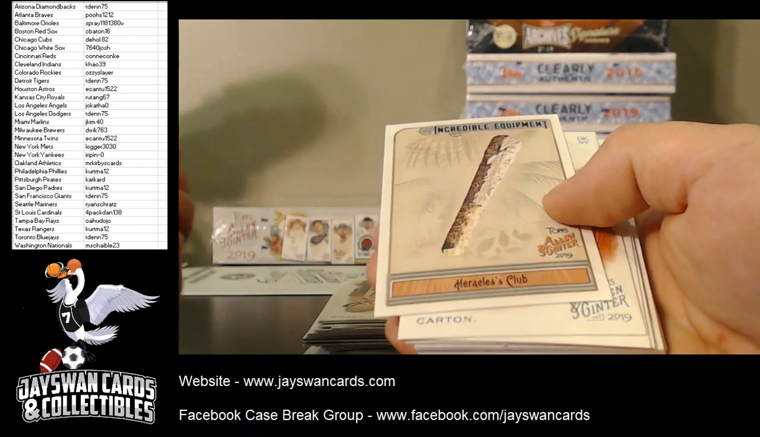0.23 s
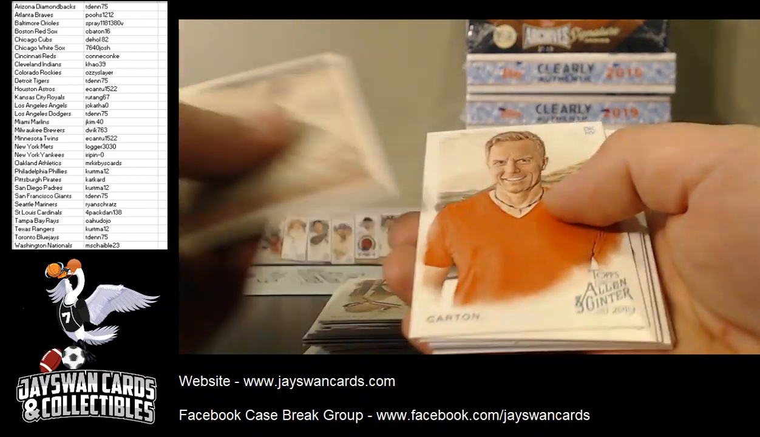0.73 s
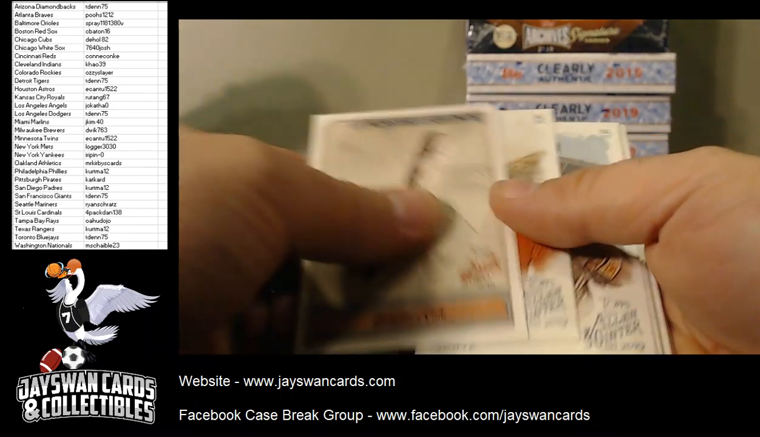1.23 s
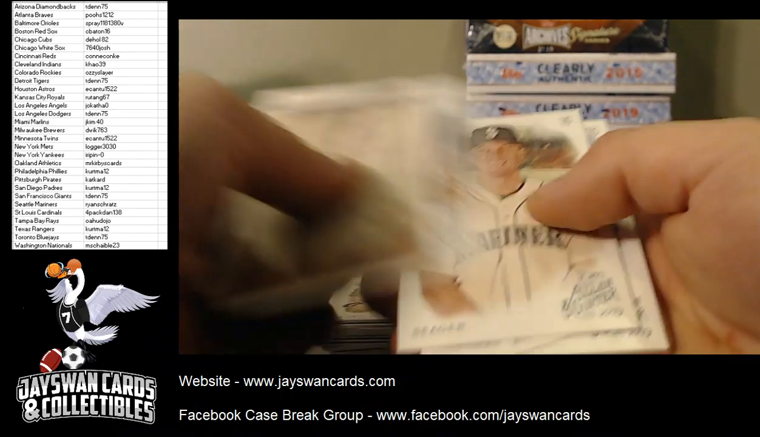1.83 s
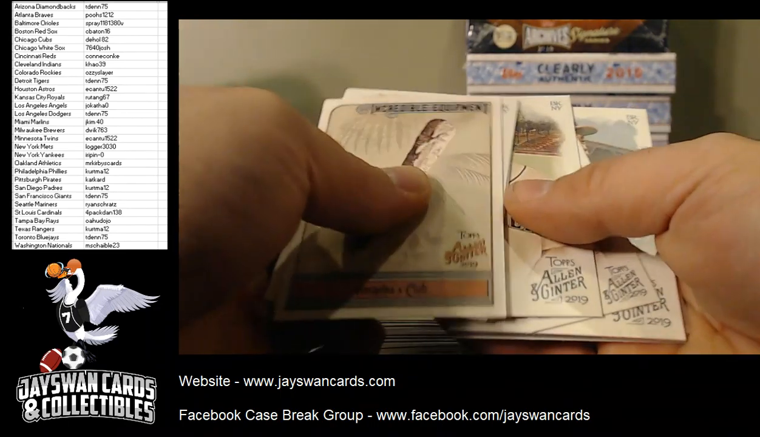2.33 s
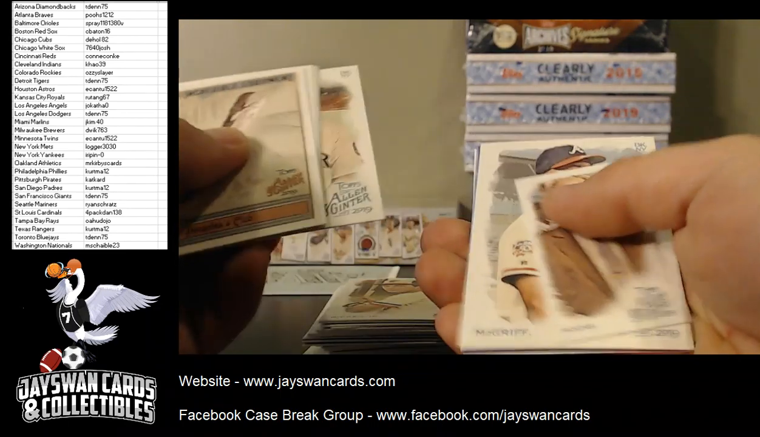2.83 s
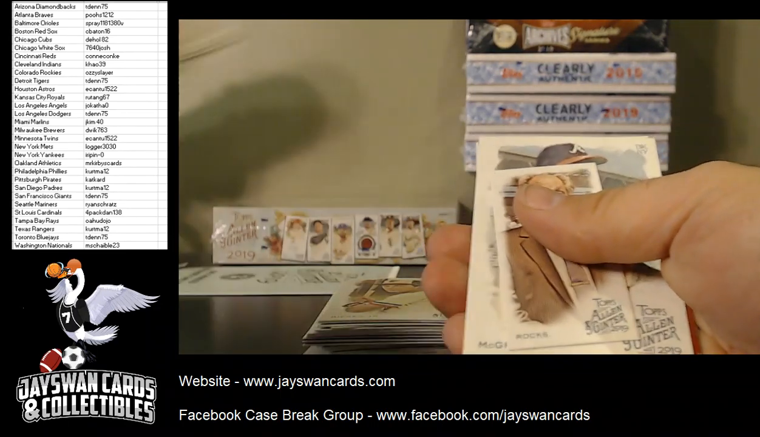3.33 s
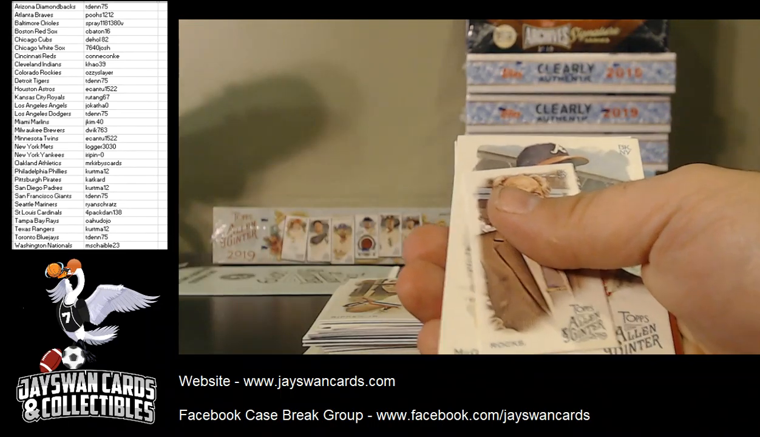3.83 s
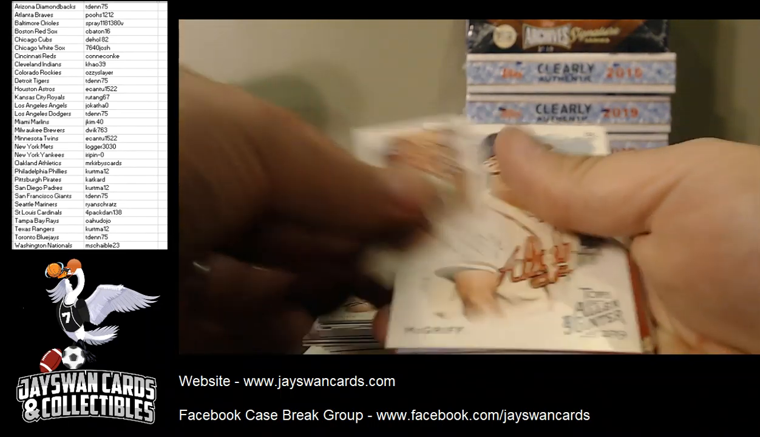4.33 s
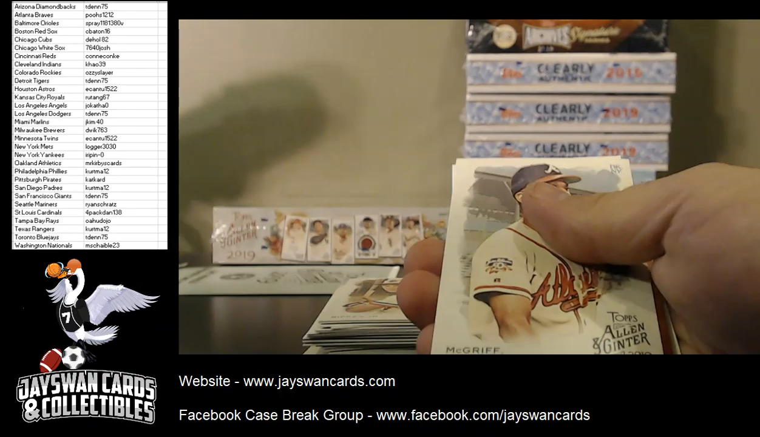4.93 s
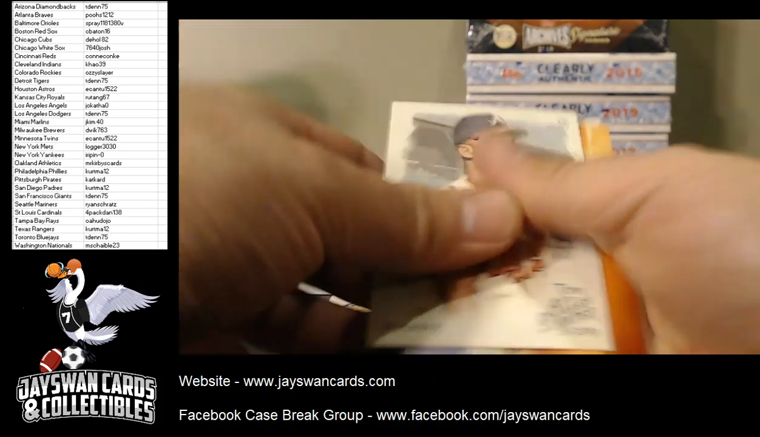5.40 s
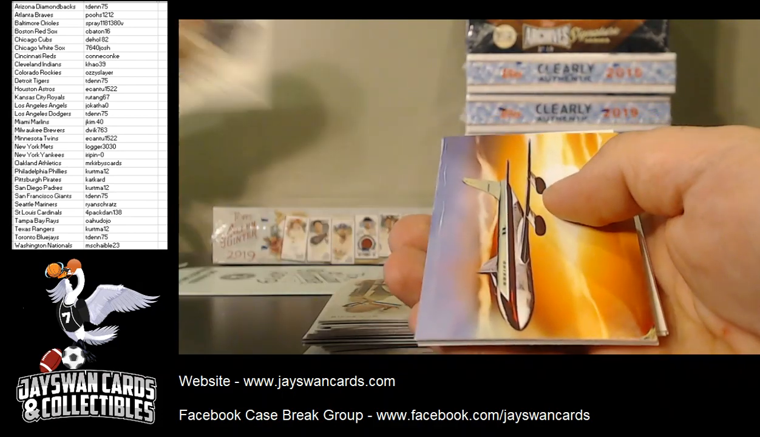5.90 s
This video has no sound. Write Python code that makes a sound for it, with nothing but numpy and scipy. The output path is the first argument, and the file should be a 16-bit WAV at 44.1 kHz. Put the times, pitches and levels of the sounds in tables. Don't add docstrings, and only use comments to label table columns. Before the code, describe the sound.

Quick card flicks and soft papery swipes over a quiet room hum, with low table bumps and a hard thud late on.

```python
import sys
import numpy as np
from scipy import signal
from scipy.fft import rfft, irfft
from scipy.io import wavfile
from scipy.ndimage import uniform_filter1d

SR = 44100
rng = np.random.default_rng(int(sys.argv[2]) if len(sys.argv) > 2 else 0)


def wrap_up_sound(samples):
    columns = np.atleast_2d(samples).T
    tamed = np.clip(columns, -1, 1)
    steps = np.round(tamed * 32767).astype(np.int16)
    wavfile.write(sys.argv[1], SR, steps)


def ratio_of_db(decibels):
    return 10 ** (np.asarray(decibels, float) / 20)


N = 271653

# start_s, length_s, hiss_db, edge_ring_hz
GLIDES = [(0.697, 0.041, -60, 2000), (1.498, 0.064, -52, 7550), (2.007, 0.12, -54.5, 1970),
          (2.12, 0.038, -56.5, 7050), (2.228, 0.11, -53.5, 6730), (2.45, 0.13, -59, 6800),
          (2.725, 0.071, -47.5, 8800), (2.779, 0.066, -51, 3900), (2.972, 0.089, -55.5, 3740),
          (3.04, 0.11, -60, 6800), (3.143, 0.092, -52, 6700), (3.425, 0.036, -61.5, 3900),
          (3.529, 0.089, -47.5, 6720), (4.418, 0.062, -62.5, 7200), (4.594, 0.032, -46, 5200),
          (5.291, 0.059, -53, 5130)]
# start_s, length_s, hiss_db, edge_ring_hz
PUSHES = [(0.063, 0.03, -59, 4800), (0.135, 0.014, -50.5, 7300), (0.513, 0.13, -66.5, 2030),
          (0.62, 0.068, -63.5, 2280), (0.871, 0.022, -66, 8700), (0.925, 0.052, -67.5, 2300),
          (1.411, 0.075, -66, 7500), (1.596, 0.22, -63.5, 3100), (2.324, 0.14, -59.5, 3120),
          (2.883, 0.079, -56, 2390), (3.644, 0.1, -61, 2150), (3.723, 0.11, -61.5, 2130),
          (4.11, 0.064, -57.5, 3350), (4.18, 0.057, -59, 2870), (4.348, 0.081, -68.5, 2020),
          (4.575, 0.014, -56, 3700), (5.004, 0.14, -65, 3800), (5.21, 0.19, -56.5, 6960),
          (5.356, 0.033, -55.5, 3400), (5.515, 0.079, -60.5, 6500), (5.472, .055, -71.5, 7000),
          (5.593, .04, -71, 6000), (5.696, 0.005, -66, 6000), (5.721, 0.026, -62, 3070),
          (5.727, .022, -65, 9000), (5.872, 0.011, -56, 6660)]
# start_s, length_s, hiss_db, edge_ring_hz
FLICKS = [
    (0.098, 0.0086, -49.5, 2700),
    (2.097, 0.015, -53, 5460),
    (4.689, 0.035, -61, 2150),
    (5.75, 0.017, -54, 9300),
    (5.762, 0.046, -48, 3250),
    (5.819, 0.021, -49, 7200),
]
# start_s, length_s, hiss_db, edge_ring_hz
SWIPES = [
    (1.545, 0.068, -56, 4840),
    (2.564, 0.029, -49, 5630),
    (2.588, 0.073, -54.5, 6860),
    (4.615, 0.085, -52.5, 4720),
]
STROKE_BODY_DB = [
    -14,
    -5.5,
    2,
    -3.5,
]
STROKE_SHEEN_DB = [
    -1.5,
    -2.5,
    0.5,
    3.5,
]
SHEEN_SLOPE = [
    1.2,
    5.1,
    4.3,
    .1,
]
# frequency_hz, level_db
PAPER = [(1470, -32), (2500, -9.5), (2610, -11.5), (3650, -9), (4840, -8), (5310, -11.5), (7260, -5.5),
         (9300, -7), (12100, -48.5), (20500, -120)]
# frequency_hz, level_db
SHEEN = [(7500, -25), (9300, -1), (12500, -1.5), (15500, -3.5), (16500, -5)]
# frequency_hz, level_db
BODY = [(150, 1), (290, 6), (500, 2), (873, 3), (1090, -2), (1810, 6), (2060, 6.5), (4000, -12),
        (5200, -19), (8800, -120)]
# frequency_hz, likeness_0_to_1
CARD_SAME = [(40, 0.87), (70, 0.2), (300, 0.35), (2000, 0.7), (8000, 0.47), (16000, 0.38)]
# time_s, level_db
RUSTLE = [(0.0, -56.5), (0.08, -55), (0.17, -86), (0.75, -65), (0.86, -84), (1.3, -80.5), (1.6, -57),
          (1.8, -78), (2.02, -73), (2.09, -60), (3.3, -62), (3.65, -59), (4.08, -67), (4.19, -58.5),
          (4.46, -81.5), (5.21, -62.5), (5.75, -88), (6.16, -72.5)]
# frequency_hz, level_db
SKIN = [(350, -26), (600, -8), (1600, -5.5), (2280, -2.5), (4560, -3.5), (5440, -9.5), (6850, -5.5),
        (15500, -15)]
# time_s, peak_db, ring_hz, crack_re_peak_db
SNAPS = [(0.097, -34.5, 2540, 1), (0.1062, -28.5, 3170, -7), (0.1163, -38, 1960, 8),
         (0.3527, -40, 1200, -17), (0.8663, -31.5, 11300, -23), (1.761, -44.5, 7200, 5.5),
         (2.105, -44, 5400, 2), (2.3776, -43, 3210, -8), (4.594, -44, 3300, 5), (4.545, -42.5, 1660, -2),
         (4.692, -42, 5730, 1), (4.7007, -37.5, 2180, -8), (5.5812, -49.5, 6900, 11.5),
         (5.7172, -38.5, 3100, 1.5), (1.474, -51.5, 2000, 11), (5.7776, -37, 1500, 2),
         (5.797, -33, 3200, 0), (5.8083, -32.5, 1700, 6)]
# time_s, peak_db, ring_hz, thud_re_peak_db, crack_re_peak_db
TAPS = [(0.0105, -44, 2210, 6.5, 10.5), (0.0415, -41.5, 1130, 6.5, 7.5), (0.1026, -34.5, 2950, 7.5, 2),
        (1.6325, -41.5, 3250, 5.5, 8.5), (2.0625, -40, 1770, 4.5, 4), (2.0932, -37.5, 1100, 8.5, 7),
        (2.3607, -44, 2540, 4, 5), (2.573, -44, 1500, 9, 7), (3.1500, -41.5, 885, 5.5, 6),
        (3.5993, -39.5, 2020, 9, 5), (3.6614, -56, 820, 12, -2), (5.3666, -38, 690, 2, 0)]
# frequency_hz, level_db
CRACK = [(300, -16), (700, -1), (2000, -3), (4000, -4), (8000, -3.5), (13000, -13), (15500, -17),
         (16500, -25)]
# time_s, peak_db, sign
WHIP = [
    (5.7624, -8.5, -1),
    (5.7626, -7.5, 1),
    (5.76295, -8, -1),
    (5.7635, -19, 1),
    (5.76415, -19, -1),
    (5.7655, -20.5, 1),
    (5.8085, -27, -1),
    (5.7172, -36, 1),
]
# ring_hz, level_db, t60_s
WHIP_RING = [(573, -7, .006), (1237, -8.5, .009), (1750, -8.5, .007), (2374, -9, .0075), (3109, -11, .011),
             (4018, -15.5, .009), (4570, -21.5, .012), (5480, -.5, .005), (6286, -4, .006),
             (7460, -7, .006), (8231, -3, .003), (9800, -4, .004), (11500, -9, .005), (13440, -12, .0045)]
# time_s, peak_db, ring_hz
PINGS = [(0.0108, -35, 4500), (0.0108, -41, 800), (0.0958, -32, 2500), (0.0958, -32, 7500),
         (0.1028, -38, 4200), (0.1056, -26.5, 3070), (0.1056, -29, 4700), (0.1056, -29, 6500),
         (0.91, -52, 7000), (2.0625, -43, 1750), (2.0625, -40.5, 700), (2.0625, -36, 4160),
         (2.0932, -38.5, 656), (2.0955, -33, 5940), (2.0955, -39, 4300), (2.104, -38, 2900),
         (2.1045, -32, 4400), (2.1035, -30, 5050), (2.1045, -32, 6385), (2.104, -33, 9300),
         (2.576, -30, 6340), (2.576, -29, 10000), (2.576, -34, 12300), (3.15, -42, 860), (3.15, -40, 1870),
         (3.15, -42, 2640), (3.157, -38, 3510), (3.157, -40, 7400), (3.178, -46, 430), (3.195, -50, 400),
         (2.372, -45, 380), (2.574, -38, 304), (5.7635, -35, 640), (3.5993, -34.5, 1850),
         (3.5993, -38, 2390), (3.5993, -38, 1040), (3.6612, -43.5, 280), (4.5452, -39, 345),
         (4.5452, -45, 830), (4.5452, -41, 3620), (4.595, -41, 3420), (4.595, -39, 4260),
         (4.595, -39, 7430), (4.693, -33, 5790), (4.693, -40, 4380), (5.3672, -32, 800),
         (5.3672, -38, 2190), (5.3672, -36.5, 3190), (5.7175, -38.5, 880), (5.7175, -36, 2640),
         (5.7175, -32.5, 3165), (5.7175, -41, 4070), (5.8083, -27.5, 1080), (5.8083, -30.5, 1980),
         (5.8083, -30, 4870), (5.8083, -33, 2700), (5.8083, -30, 11300), (5.8083, -35, 15000)]
# time_s, peak_db, ring_hz
RATTLE = [
    (4.698, -29, 200),
    (4.7065, -46, 800),
    (4.712, -43, 650),
    (4.7175, -45, 850),
    (4.724, -44, 700),
    (4.737, -46, 420),
    (4.752, -42, 260),
]
# start_s, length_s, level_db, first_hz, last_hz
SINGS = [(2.33, .1, -61, 2500, 3200), (2.77, .08, -59, 4900, 3300), (2.883, 0.081, -58, 2000, 2840),
         (2.961, .12, -61, 3300, 4000), (3.69, 0.15, -61, 2200, 2900), (4.125, .05, -58, 3400, 2890),
         (5.7563, 0.0081, -38.5, 3050, 3070), (5.783, 0.016, -47, 3100, 3200),
         (0.088, 0.011, -52, 2300, 2580), (.128, .036, -55.5, 1000, 848), (1.49, .02, -64, 1900, 2000),
         (1.509, 0.032, -60, 4500, 3800), (2.077, 0.012, -51, 1800, 1800), (2.27, 0.038, -62, 4400, 5000),
         (2.403, .03, -55, 3000, 3200), (3.545, .04, -57, 3200, 3400), (3.543, 0.027, -55, 4700, 4570),
         (4.59, .032, -52, 3400, 3800), (5.52, .068, -61.5, 3050, 3560), (5.7555, .005, -47, 9300, 9800),
         (5.766, 0.035, -52, 820, 695), (5.767, 0.039, -48, 2400, 2000)]
# peak_s, rise_s, board_db, grip_0_to_1.3
DRAGS = [(0.035, 0.053, -62.5, 1.3), (0.12, 0.035, -49, 0.96), (0.5, 0.06, -55, 0.3), (0.7, 0.1, -49, 0.05),
         (0.95, 0.13, -60, .6), (1.52, 0.049, -49.5, 0.68), (1.63, 0.035, -48.5, .7),
         (1.77, 0.08, -49.5, .05), (2.1, 0.054, -48, .55), (2.38, 0.07, -46, 0.6),
         (2.53, 0.073, -54.5, 0.4), (2.75, 0.26, -56.5, 0.7), (2.96, 0.085, -47, 0.25),
         (3.19, 0.05, -50.5, 0.58), (3.5, 0.049, -44.5, 0.28), (3.6, 0.024, -56, .9),
         (3.77, 0.08, -48, 0.3), (4.08, 0.077, -52, 0.24), (4.55, 0.06, -54, .4),
         (4.65, 0.075, -45.5, 0.56), (4.73, 0.064, -44, .55), (1.33, 0.11, -58.5, .4),
         (4.9, 0.06, -52, 0.2), (5.2, 0.11, -50.5, 0.56), (5.45, 0.15, -65, 1.07),
         (5.775, 0.032, -51.5, 1.3), (5.83, 0.036, -42, 0.73)]
REST_DB = [
    [-59],
    [-76],
    [-76.5],
    [-74.5],
]
# frequency_hz, level_db
SCRAPE = [(140, -20), (240, -0.5), (411, -2), (562, -12), (947, -12), (1500, -29), (1950, -39),
          (3300, -120)]
# start_s, length_s, level_db
JUDDER = (3.315, 0.11, -45.5)
JUDDER_DB = [
    [-2],
    [0.5],
    [-6.5],
    [-13.5],
]
# time_s, level_db
CATCHES = [(3.256, -47.5), (3.265, -49), (3.299, -46), (3.304, -55), (3.321, -44), (3.328, -44.5),
           (3.336, -53), (3.344, -43.5), (3.351, -45.5), (3.364, -45.5), (3.37, -48), (3.38, -46.5),
           (3.391, -49), (3.4, -51), (3.41, -48.5), (3.419, -47), (3.425, -49), (3.437, -54), (3.49, -53),
           (3.509, -57)]
# ring_hz, level_db, t60_s
JUDDER_RING = [(95.5, 5, 0.092), (164.5, 3, 0.11), (228, -6, .04), (348, -1, .03), (470, 1, 0.014),
               (900, 1, 0.0092), (1200, -7, .008), (1500, -4, .006), (2000, -6, 0.0044)]
# time_s, board_peak_db, strongest_ring_hz, t60_s, left_minus_right_db
KNOCKS = [(0.012, -38, 151, 0.071, 7), (0.043, -38.5, 177, 0.094, 6), (0.1215, -33, 105, .04, 2),
          (0.653, -40.5, 70.0, 0.16, 2), (1.484, -34, 61.4, 0.15, 4), (1.624, -43.5, 61.7, 0.25, -11),
          (1.735, -36.5, 66.3, 0.26, 2), (2.938, -42.5, 50, 0.44, 1.0), (3.711, -36.5, 69.6, 0.48, 1.5),
          (3.76, -37.5, 59.2, 0.19, -6), (4.066, -39.5, 65.6, 0.24, 4.0), (4.551, -30, 80.7, 0.19, 8),
          (4.671, -29.5, 92, 0.15, 0), (5.7183, -33, 187, 0.064, 5), (5.764, -28.5, 200, 0.091, 3),
          (5.822, -25.5, 57, 0.13, 5)]
# ring_hz, level_db, t60_s
BOARD = [(109.5, -3.5, 0.09), (165, -21, 0.21), (208, -28, 0.17), (233, -14, 0.19), (308, -6.5, 0.072),
         (393, -19, 0.11), (590, -7.5, 0.013)]
# ring_hz, level_db, t60_s, delay_s
SLAM = [(74, 0.5, 0.124, .0022), (105, -1.5, .105, .006), (174, -23, .22, 0.011),
        (215, -14.5, 0.19, 0.0011), (317, -13.5, .08, .0006), (398, -17, .086, 0.00042),
        (447, 2.5, 0.0052, 0.000081), (588, -4, 0.0078, 0.00012), (775, -28, .06, .0006)]
# time_s, level_db, resting_arm_damping_db_per_s
JOLTS = [
    (0.128, -15.5, 2),
    (4.71, -13.5, 16),
    (5.819, -15.5, -4),
]
# sway_hz, t60_s, share_left, share_right
SWAY = [(28, .95, -.42, .5), (24.8, .5, .42, .9)]
# frequency_hz, t60_s
ROOM = [(200, 0.3), (2000, 0.23), (10000, 0.17)]
# frequency_hz, level_db
AIR = [(35, -23), (60, 0), (71, -9.0), (165, -9.5), (213, -13.5), (275, -17.5), (504, -14), (554, -25),
       (608, -19.5), (1040, -16.0), (1410, -19.5), (1950, -15.5), (2240, -18.5), (3580, -26.5),
       (14500, -37), (16500, -32)]
# frequency_hz, likeness_0_to_1
AIR_SAME = [(40, 0.2), (300, 0.2), (2000, 0.21), (5000, 0.067), (16000, 0.072)]
# hum_hz, rms_db
HUM = [(120, -69), (279, -74.5), (559, -78), (1922, -76), (15493, -80.5)]


def evened(x):
    return x / np.sqrt(np.mean(x ** 2) + 1e-20)


def read(points, hz):
    f, value = np.transpose(points)
    return np.interp(np.log(hz + 1), np.log(f + 1), value, -100, -100)


def columns(rows):
    s, *rest = np.transpose(rows)
    return [np.interp(np.arange(N) / SR, s, c) for c in rest]


def panned(pan_db):
    return ratio_of_db(np.array([pan_db / 2, -pan_db / 2]))


def add(mix, s, sound):
    part = mix[:, round(s * SR):][:, :sound.shape[1]]
    part += sound[:, :part.shape[1]]


def coloured(x, points):
    log_gain = np.log(ratio_of_db(read(points, abs(np.fft.fftfreq(8192, 1 / SR)))))
    taps = np.fft.ifft(np.exp(np.conj(signal.hilbert(log_gain)))).real[:4096]
    return signal.oaconvolve(x, taps[None], axes=1)[:, :x.shape[1]]


def paired(a, b, likeness):
    f, value = np.transpose(likeness)
    same = np.clip(np.interp(np.log(np.fft.rfftfreq(N, 1 / SR) + 1), np.log(f), value), 0, 1)
    return np.array([a, irfft(same * rfft(a) + np.sqrt(1 - same ** 2) * rfft(b), N)])


def resonate(x, hz, width):
    turn = np.exp(2j * np.pi * np.cumsum(hz * np.ones(N)) / SR)
    r = np.exp(-np.pi * width / SR)
    return 2 * (turn * signal.lfilter([1 - r], [1, -r], x / turn)).real


def slips(per_s, spread_db, flicker_db, flicker_s):
    flicker = evened(uniform_filter1d(rng.standard_normal(N), round(flicker_s * SR)))
    clumps = ratio_of_db(flicker_db * flicker)
    size = ratio_of_db(spread_db * np.minimum(rng.exponential(1, (2, N)), 4))
    size = size * (rng.random((2, N)) < per_s / SR)
    return paired(*(size * rng.standard_normal((2, N)) * clumps), CARD_SAME)


def patchy(x, depth_db):
    hz, t, z = signal.stft(x, SR, nperseg=256)
    patches = uniform_filter1d(rng.standard_normal((len(t), len(hz))), size=14, axis=0)
    patches = uniform_filter1d(patches, size=6, axis=1)
    return evened(signal.istft(z * ratio_of_db(depth_db * evened(patches).T), SR, nperseg=256)[1][:, :N])


def strokes():
    rows = []
    for k, kind in enumerate([GLIDES, PUSHES, FLICKS, SWIPES]):
        for row in kind:
            sheen_db = STROKE_SHEEN_DB[k] + SHEEN_SLOPE[k] * np.log2(row[3] / 4000)
            rows.append((*row, STROKE_BODY_DB[k], sheen_db))
    return sorted(rows)


def slides():
    gains, edge_hz = np.zeros((3, N)), np.full(N, 4000.)
    for s, length, db, hz, body_db, sheen_db in strokes():
        u = np.linspace(0, 1, round((length + .012) * SR))
        ramps = np.minimum(np.minimum(u / 0.21, (1 - u) / 0.3), 1)
        stroke = ramps ** 0.88 * (0.69 + 0.5 * np.sin(np.pi * u))
        add(gains, max(s - .004, 0), ratio_of_db(db + np.array([[0], [body_db], [sheen_db]])) * stroke)
        edge_hz[round(max(s, 0) * SR):] = hz
    drive = patchy(slips(per_s=15000, spread_db=1.8, flicker_db=1.05, flicker_s=0.004), depth_db=2.0)
    ring = evened(resonate(drive, uniform_filter1d(edge_hz, size=1300), 780))
    hiss = evened(coloured(drive, PAPER)) + ratio_of_db(-11) * ring
    body = evened(coloured(drive, BODY)) + ratio_of_db(-3) * ring
    sheen = evened(coloured(drive, SHEEN))
    return gains[0] * hiss + gains[1] * body + gains[2] * sheen


def rustle():
    drive = patchy(slips(per_s=12000, spread_db=1.2, flicker_db=2.1, flicker_s=0.013), depth_db=2.5)
    return ratio_of_db(columns(RUSTLE)[0] + 2.5) * evened(coloured(drive, SKIN))


def clicks():
    return [(s, db, hz, -22, crack_db) for s, db, hz, crack_db in SNAPS] + TAPS


def snaps():
    out, t = np.zeros((2, N)), np.arange(3000) / SR
    release = 1.9 * (np.arange(len(t)) == 20)
    for s, db, hz, thud_db, crack_db in clicks():
        t60 = max(0.014 - .0001 * (db + 40), .004)
        a, b = rng.standard_normal((2, len(t))) * ratio_of_db(-60 * t / t60) * (1 - np.exp(-t / 0.00046))
        burst = np.array([a + 0.14 * b, a - 0.48 * b])
        crack = coloured(burst * ratio_of_db(-60 * t / 0.034) + release, CRACK)
        band = signal.butter(2, [hz * 0.75, min(hz * 1.4, 20000)], "band", fs=SR)
        ring = signal.lfilter(*band, burst)
        thud = -np.sin(2 * np.pi * 290 * t) * ratio_of_db(thud_db - 2.0 - 60 * t / 0.014)
        add(out, s, ratio_of_db(db) * (ring / abs(ring).max() + ratio_of_db(crack_db) * crack / abs(crack).max() + thud))
    return out


def whip():
    detune, lag_s = .009, .00002
    t, out = np.arange(3000) / SR, np.zeros((2, N))
    side = np.array([[1], [-1]])
    for s, db, sign in WHIP:
        late = np.maximum(t - lag_s * (1 + sign * side) / 2, 0)
        ring = 0
        for k, (hz, mode_db, t60) in enumerate(WHIP_RING):
            mode_hz = hz * (1 + detune * side * (-1) ** k)
            ring = ring + np.sin(2 * np.pi * mode_hz * late) * ratio_of_db(mode_db - 60 * late / t60)
        gain = np.sign(sign) * ratio_of_db(db + 2.6) * panned(1.5 * sign)[:, None]
        add(out, s, gain * ring / abs(ring).max())
    return out


def pings():
    t, out = np.arange(2000) / SR, np.zeros((2, N))
    for k, (s, db, hz) in enumerate(PINGS + RATTLE):
        skew = .4 * (-1) ** k * np.array([[1], [-1]])
        t60 = .013 * (1000 / hz) ** .28
        fade = ratio_of_db(db - 60 * t / t60) * (1 - np.exp(-t / 0.0002))
        add(out, s, -np.sin(2 * np.pi * hz * t + skew) * fade)
    return out


def sings():
    out, width_hz = np.zeros((2, N)), 670
    for s, length, db, hz, last_hz in SINGS:
        u = np.linspace(0, 1, round(length * SR))
        a, b = rng.standard_normal((2, 8000, 2)) @ np.array([1, 1j])
        fuzz = signal.lfilter(*signal.butter(2, width_hz / 2, fs=SR), [a + 0.37 * b, a - .45 * b])
        fuzz = fuzz[:, -len(u):]
        turn = np.exp(2j * np.pi * np.cumsum(hz + (last_hz - hz) * u) / SR)
        add(out, s, ratio_of_db(db) * evened((fuzz * turn).real) * np.sin(np.pi * u) ** 0.39)
    return out


def arm_levels():
    skirt_db = 10
    t, power = np.arange(0, N + 64, 64) / SR, ratio_of_db(REST_DB) ** 2
    for s, rise, db, grip in DRAGS:
        away = np.maximum((s - t) / rise, (t - s) / (rise * 1.16))
        late = abs(t - s - 0.034) / (rise * 1.43)
        wobble_db = -49 + 0.6 * (db + 50.5) - skirt_db * late
        board_db = db - skirt_db * away
        drum_db = board_db - 24 + 24.5 * grip
        scrape_db = board_db - 25.5 + 24.5 * grip
        power = power + ratio_of_db([wobble_db, board_db, drum_db, scrape_db]) ** 2
    s, length, db = JUDDER
    swell = np.clip(np.minimum((t - s + 0.066) / 0.13, (s + length - t) / .03 + 1), 0, 1)
    power = power + ratio_of_db(db + np.array(JUDDER_DB)) ** 2 * swell ** 2
    return np.repeat(10 * np.log10(power), 64, axis=1)[:, :N]


def rubs():
    wobble_db, board_db, drum_db, scrape_db = arm_levels()
    wobble_db, board_db = np.minimum(wobble_db, -46), np.minimum(board_db, -41)
    drive = slips(per_s=1500, spread_db=2.5, flicker_db=2.0, flicker_s=.006)
    drift = evened(uniform_filter1d(rng.standard_normal(N), size=1500))
    turns = np.cumsum(46 * ratio_of_db(2.8 * drift)) / SR
    gripped = drive * (0.18 + np.exp(-(turns % 1) / 0.24))
    wobble = evened(resonate(resonate(drive, 26.6, 11.2), 22.9, 25.5)) * panned(-9.0)[:, None]
    board = evened(resonate(resonate(drive, 66.0, 32), 67, 39)) * panned(4.7)[:, None]
    scrape = evened(coloured(gripped, SCRAPE)) * panned(3.4)[:, None]
    drum = evened(resonate(resonate(gripped, 172, 65), 163, 82)) * panned(3.3)[:, None]
    return ratio_of_db(wobble_db) * wobble + ratio_of_db(drum_db) * drum + ratio_of_db(board_db) * board + ratio_of_db(scrape_db) * scrape


def judder():
    t, out = np.arange(5000) / SR, np.zeros((2, N))
    hz, ring_db, t60 = np.transpose(JUDDER_RING)[:, :, None]
    spots = rng.uniform(-1.16, 1, (len(CATCHES), 2, len(hz), 1))
    for (s, db), spot in zip(CATCHES, spots):
        f = hz * (1 + 0.11 * np.minimum(hz / 500, 1) * spot)
        swell = 1 - np.exp(-t * hz / 0.2)
        ring = np.sin(2 * np.pi * f * t) * ratio_of_db(ring_db - 60 * t / t60) * swell
        add(out, s + .0008, -ratio_of_db(db + 2.5) * panned(1.9)[:, None] * ring.sum(1))
    return out


def knocks():
    out, t = np.zeros((2, N)), np.arange(20000) / SR
    upper = sum(np.sin(2 * np.pi * hz * t) * ratio_of_db(db - 60 * t / t60) for hz, db, t60 in BOARD)
    for s, db, hz, t60, pan_db in KNOCKS:
        ring = np.sin(2 * np.pi * hz * t) * ratio_of_db(-60 * t / t60) * (1 - np.exp(-t / 0.0037))
        hard = ratio_of_db(0.47 * (db - 2.0))
        add(out, s, ratio_of_db(db) * panned(pan_db)[:, None] * (hard * upper - ring))
    return out


def slam():
    slam_s, slam_db, pan_db = 4.7005, -16.5, 5.5
    t, out = np.arange(12000) / SR, np.zeros((2, N))
    for hz, db, t60, delay in SLAM:
        ring = np.sin(2 * np.pi * hz * t) * ratio_of_db(slam_db + db - 60 * t / t60) * (1 - np.exp(-t * hz / 0.14))
        add(out, slam_s + delay, panned(pan_db)[:, None] * ring)
    return out


def jolts():
    out, t = np.zeros((2, N)), np.arange(40000) / SR
    sway = sum(-np.sin(2 * np.pi * hz * t) * ratio_of_db(-60 * t / t60) * np.array([[left], [right]])
               for hz, t60, left, right in SWAY)
    for s, db, damp_db in JOLTS:
        add(out, s, ratio_of_db(db - damp_db * t) * sway * (1 - np.exp(-t / 0.04)))
    return out


def room(x):
    taps = np.zeros((2, SR // 2))
    at = np.arange(100, SR // 2 - 20, 20) + rng.integers(0, 20, (2, (SR // 2 - 101) // 20))
    np.put_along_axis(taps, at, rng.choice([-1., 1.], at.shape), 1)
    hz, t, z = signal.stft(taps, SR, nperseg=256)
    t60 = np.interp(hz, *np.transpose(ROOM))
    tail = signal.istft(z * ratio_of_db(-60 * t / t60[:, None]), SR, nperseg=256)[1]
    return signal.fftconvolve(x, tail / np.linalg.norm(tail[0]), axes=1)[:, :N]


def air():
    hush = evened(coloured(paired(*rng.standard_normal((2, N)), AIR_SAME), AIR))
    t, out = np.arange(N) / SR, ratio_of_db(-59.5) * hush
    for hz, db in HUM:
        drift = np.cumsum(evened(uniform_filter1d(rng.standard_normal(N), 4000))) * 22 / SR
        phase = drift + np.array([[.3], [-.3]])
        out = out + np.sqrt(2) * ratio_of_db(db) * np.sin(2 * np.pi * hz * t + phase)
    return out


def scene():
    cards = slides() + rustle() + snaps() + pings() + whip()
    cards = cards + ratio_of_db(-11.5) * room(cards)
    table = rubs() + judder() + knocks() + slam() + jolts()
    return cards + table + sings() + air()


def top_cut(x):
    return signal.sosfilt(signal.butter(12, 16470, fs=SR, output="sos"), x)


def record(dry):
    lowpass = signal.firwin(511, 15800, window=("kaiser", 9), fs=SR)
    limited = signal.oaconvolve(dry, lowpass[None], "same")
    return top_cut(limited)


dry = scene()
out = record(dry)
wrap_up_sound(out)
```